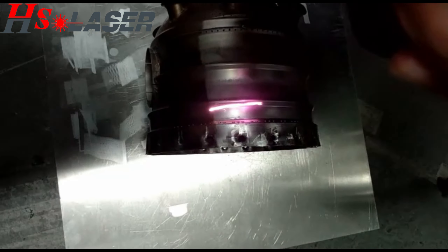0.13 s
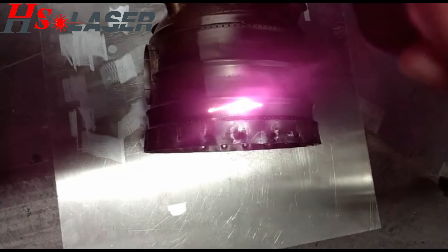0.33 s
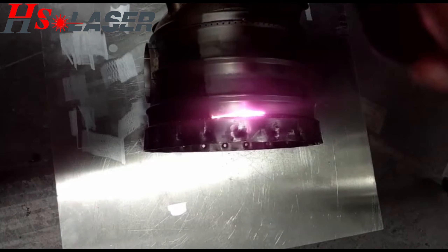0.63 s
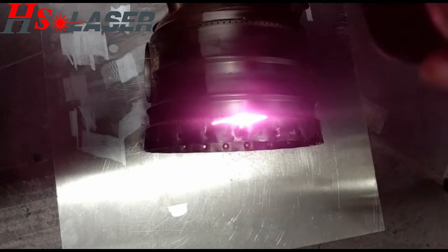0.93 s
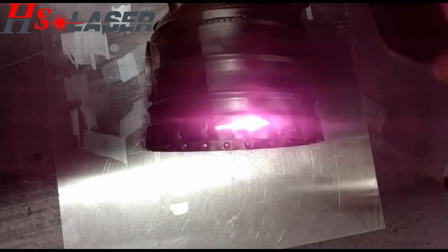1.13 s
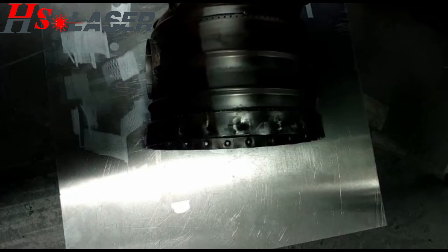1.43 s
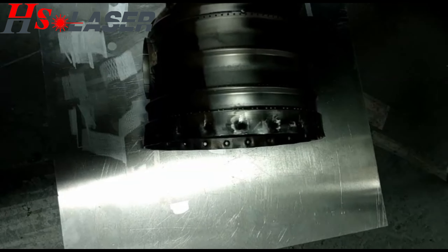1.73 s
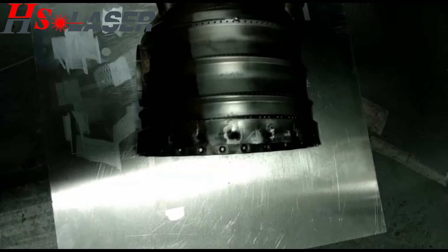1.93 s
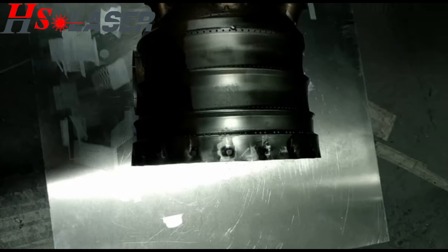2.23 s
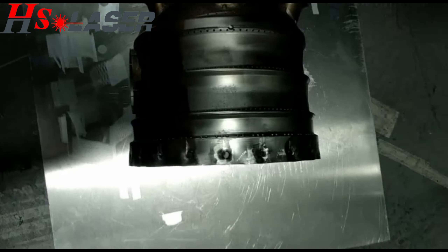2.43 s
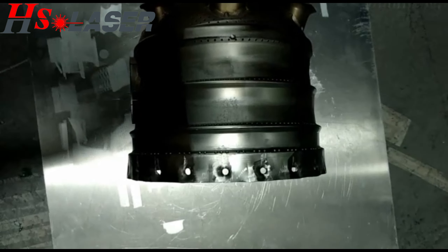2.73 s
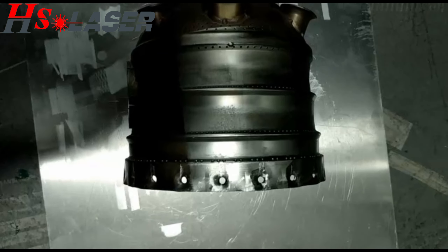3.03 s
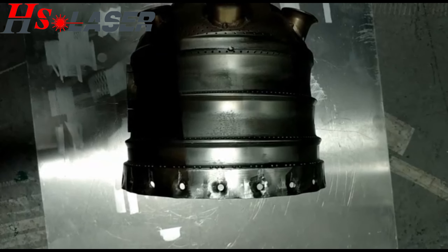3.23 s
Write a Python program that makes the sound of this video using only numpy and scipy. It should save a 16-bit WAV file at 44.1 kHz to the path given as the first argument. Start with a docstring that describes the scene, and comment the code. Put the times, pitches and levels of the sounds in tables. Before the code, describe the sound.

A pulsed laser cleaner buzzes harshly on a steel casing from the start, close by, its rapid snaps fluttering with a thin metallic whine. Dirt flakes crack, loudest around 0.7 seconds. At about 1.4 seconds the buzz stops, leaving the steady drone of a cooling unit in the workshop. A thin air hiss swells from 2 seconds, and a small scrape and a soft tick come around 3 seconds.

```python
"""Laser cleaning a steel casing

A pulsed laser sweeps a line across steel in a workshop, heard from a hand-held camera close by.
A hundred shots a second snap on the surface, harder at one end of the sweep and where the dirt is
thick; flakes crack and the laser head buzzes along. The beam stops near 1.45 s, leaving the drone
of the cooling unit, a hiss of air and a few small handling noises."""
import sys
import numpy as np
from scipy import signal
from scipy.fft import rfft, irfft
from scipy.io import wavfile
from scipy.ndimage import uniform_filter1d

SR = 44100
rng = np.random.default_rng(int(sys.argv[2]) if len(sys.argv) > 2 else 0)


def digitize_waveform(pressure):
    """Quantize a signal to 16-bit integers and store it at the path in sys.argv[1].

    Rows of a 2-D input are taken as channels; values are limited to [-1, 1].
    """
    field = np.atleast_2d(pressure).T
    bounded = np.clip(field, -1, 1)
    quanta = np.round(bounded * 32767).astype(np.int16)
    wavfile.write(sys.argv[1], SR, quanta)


N = 148617
T = np.arange(N) / SR

SHOT_HZ, FIRST_SHOT_S, STOP_S = 100, .0008, 1.445
SWEEP_HZ, SWEEP_PEAK_S = 32.85, .2
SNAP_DB, DIFFUSE_DB, CASING_DB, FIZZ_DB = 3, -9, 1, -1

# Rush of the cooling fans. Each row: frequency in Hz, relative level in dB.
FAN_COLOUR = [(25, -24), (80, -87), (115, -10), (150, -1), (230, 1.5), (360, 1.5), (560, 0.5), (800, -4),
              (1300, -5), (2000, -11), (3300, -22), (4700, -23), (7000, -24.5), (10000, -54)]
# Pump and fan tones. Each row: pitch in Hz, level in dB, width of the waver in Hz.
COOLER_TONES = [(97.3, -59.5, 0.33), (197.7, -44.5, 2.58), (390, -66, 9.8), (655, -51.5, 9.25),
                (986, -54.5, 3.9)]
# Three beating tones near 300 Hz. Each row: pitch in Hz, relative level in dB, width in Hz.
DRONE_PARTIALS = [(297, -2, 13.57), (312, 0, 15.48), (272.9, -7, 18.6)]
# Swells and dips of that drone. Each row: time in seconds, gain in dB.
DRONE_FADER = [(0.0, -47.5), (0.13, -32.5), (0.19, -64), (0.27, -42), (0.55, -35), (0.62, -68), (0.76, -38),
               (1.86, -39.5), (2.05, -32.5), (2.09, -69), (2.23, -33.5), (2.65, -37.5), (2.68, -64),
               (2.76, -33), (2.83, -82), (2.86, -41), (3.28, -37.5), (3.37, -66)]
# Air resonances in the cooler's cabinet. Each row: centre in Hz, level in dB, width in Hz.
CABINET_BANDS = [(170.7, -50, 17.4), (258, -45.5, 59), (416.2, -39.5, 41)]
# Colour of the air hiss. Each row: frequency in Hz, relative level in dB.
HISS_COLOUR = [(1500, 13), (3300, -0.5), (4600, 8), (5400, 3), (7000, 3.5), (8000, 9), (9300, 14),
               (10200, -3.5)]
# Fall and rise of the hiss. Each row: time in seconds, level in dB.
HISS_FADER = [(0, -49), (1.8, -59), (2.1, -49.5), (2.6, -49), (3.05, -45.5), (3.37, -48)]
# A soft handling tick. Each row: start in seconds, level in dB.
TICK_CUES = [(3.162, -37.5)]
# Colour of that tick. Each row: frequency in Hz, relative level in dB.
TICK_COLOUR = [(1200, -3), (2500, -1), (3600, -2), (6000, -9), (8800, 0), (10000, -12)]
# What the scrape rings. Each row: pitch in Hz, relative level in dB, T60 in seconds.
SCRAPE_MODES = [(1500, 0, .02), (1900, -6, .012)]
# A faint whistle. Each row: peak time and fade in seconds, pitch and width in Hz, level in dB.
WHISTLE_CUES = [(2.05, .28, 7730, 80, -65)]
# Ring of the laser head. Each row: pitch in Hz, relative level in dB, T60 in seconds.
HEAD_MODES = [(2200, -5, .02), (2900, -4, .03), (3300, -6, .04), (3700, -9, .1), (3900, -7, .1),
              (4100, -5, .12), (4500, -2.5, .12), (5500, -11, .3)]
# The head's whine as it is brought nearer. Each row: time in seconds, level in dB.
HEAD_FADER = [(0, -80), (.6, -53.5), (.9, -49.5), (1.45, -51.5)]
# Hollow ring of the casing at its wall and its rim. Each row: pitch in Hz, relative level in dB.
WALL_MODES = [(2210, 3.5), (2480, 3.5), (3000, 0), (3270, 7.5), (3980, 9.5), (4500, -16), (5020, 2.5),
              (5600, 3.5), (6450, -18), (7320, 3.5), (7850, -1), (8340, -15), (8770, 6.5), (9220, -5)]
RIM_MODES = [(2200, 4), (2900, -3), (3300, 4), (3950, 2.5), (4480, -6), (5100, -4), (5740, 4.5), (6680, -7),
             (7900, 4), (8500, 6), (9760, -9)]
# Bursting flakes. Each row: start in seconds, level in dB, brightness in dB per octave.
FLAKE_CUES = [(.2008, -38.5, 1.5), (.3208, -49, 1), (.5108, -38, 8.5), (.5408, -45, 6), (.6508, -35.5, -2),
              (.6608, -30, 0.5), (.6808, -43, -1), (.8408, -46, 5), (1.2008, -45.5, 0), (1.3208, -45, 7)]
# Colours of a flake's crack and a shot's snap. Each row: frequency in Hz, relative level in dB.
CRACK_COLOUR = [(200, -4), (700, 17), (2000, 11.5), (3500, 6.5), (5600, 14.5), (6800, 6.5), (8500, 16),
                (10300, -11)]
SNAP_COLOUR = [(300, -11), (1000, -1.5), (1700, -6), (2200, -5.5), (2700, -7), (4200, -6.5), (5200, 4),
               (5750, 4), (6500, 0), (7900, 7.5), (9000, 1), (9800, 9), (10300, -6)]
# How hard the beam bites into the dirt. Each row: time in seconds, relative level in dB.
BITE_FADER = [(0.02, -34.5), (0.26, -27.5), (0.29, -38.5), (0.32, -32.5), (0.54, -22.5), (0.62, -22.5),
              (0.66, -23.5), (0.78, -33), (0.81, -26), (0.87, -29.5), (0.96, -38.5), (1.08, -39),
              (1.21, -31), (1.27, -46), (1.3, -39.5), (1.33, -23), (1.38, -38), (1.42, -21), (1.45, -31)]
# How much softer the shots land at the far end of the sweep. Each row: time in seconds, drop in dB.
SWEEP_DROP = [(.03, 2.5), (.2, 33), (.37, 16.5), (.58, 27.5), (.75, 33), (.85, 14), (1.0, 23), (1.36, 12)]
# Brightness of the snaps. Each row: time in seconds, treble against body in dB.
SNAP_TILT = [(0.02, -17), (0.17, 1), (0.38, -14.5), (0.41, -7), (0.75, -7.5), (0.87, -0.5), (0.99, -16.5),
             (1.3, 1), (1.45, -10.5)]
# EQ of the reflections that give stereo width. Each row: frequency in Hz, gain in dB.
SIDE_EQ = [(25, 6), (70, -1), (160, -14.5), (300, -37.5), (700, -6.5), (2000, -19), (10000, -22)]


def undb(db):
    """Decibels to gain."""
    return 10 ** (np.asarray(db) / 20)


def curve(table, t):
    """Straight lines through the rows of a table."""
    return np.interp(t, *np.array(table, float).T)


def unit_rms(x):
    """Scale to rms 1."""
    return x / np.sqrt(np.mean(x ** 2))


def unit_energy(x):
    """Scale to energy 1."""
    return x / np.sqrt(np.sum(x ** 2))


def gains(table, size):
    """An EQ curve through (Hz, dB) points."""
    hz, db = np.array(table, float).T
    bins_hz = np.arange(size // 2 + 1) * SR / size
    return undb(np.interp(np.log(bins_hz + 1), np.log(hz), db))


def noise(colour):
    """Coloured noise, rms 1."""
    return unit_rms(irfft(rfft(rng.standard_normal(N)) * gains(colour, N), N))


def band(hz, width):
    """Noise in one narrow resonance, rms 1."""
    bins_hz = np.arange(N // 2 + 1) * SR / N
    rolloff = 1 + ((bins_hz - hz) / (width / 2)) ** 2
    return unit_rms(irfft(rfft(rng.standard_normal(N)) / rolloff, N))


def drift(rate_hz):
    """Smooth random modulation, rms 1."""
    hold = int(SR / rate_hz)
    steps = np.repeat(rng.standard_normal(N // hold + 1), hold)
    return unit_rms(uniform_filter1d(uniform_filter1d(steps, hold), hold)[:N])


def tone(hz, width, waver_db):
    """A machine tone that wavers in pitch and level, rms 1."""
    phase = 2 * np.pi * np.cumsum(hz + width / 2 * drift(18)) / SR
    return unit_rms(np.sin(phase) * undb(waver_db * drift(16)))


def grains(spread_db):
    """Dense tiny clicks of uneven size, rms 1."""
    return unit_rms(rng.standard_normal(N) * undb(spread_db * np.minimum(rng.exponential(size=N), 5)))


def click(colour, size=512):
    """The tightest click of a given colour (minimum phase)."""
    cepstrum = irfft(np.log(gains(colour, size)))
    cepstrum[1:size // 2] *= 2
    cepstrum[size // 2 + 1:] = 0
    return unit_energy(irfft(np.exp(rfft(cepstrum))))


def impulses(times, db):
    """Impulses whose level is their rms over one shot period."""
    track = np.zeros(N)
    np.add.at(track, np.round(np.asarray(times) * SR).astype(int), undb(db) * np.sqrt(SR / SHOT_HZ))
    return track


def modes(table):
    """Decaying partials from (Hz, dB, T60) rows."""
    t = T[:SR // 2]
    return unit_energy(sum(undb(db) * unit_energy(np.cos(2 * np.pi * hz * t) * undb(-60 * t / t60))
                           for hz, db, t60 in table))


def ring(x, response):
    """Pass a sound through a response."""
    return signal.fftconvolve(x, response)[:N]


def tail(delay_s, decay_s):
    """Dense reflections that die away after a pre-delay."""
    t = T[:SR // 2]
    envelope = (t >= delay_s) * np.exp(-np.maximum(t - delay_s, 0) / decay_s)
    return unit_energy(rng.standard_normal(len(t)) * envelope)


def direct_path(bounce_s=.00047, bounce_db=-6):
    """The straight path from the spot and one bounce off the casing."""
    response = np.zeros(int(bounce_s * SR) + 1)
    response[0], response[-1] = 1, undb(bounce_db)
    return response


def reflections(room_db=-2.5, room_t60_s=.31):
    """Reflections for one place of the spot: nearby metal, then the workshop."""
    metal = tail(delay_s=.0016, decay_s=.0024)
    room = tail(delay_s=.0057, decay_s=room_t60_s / np.log(1000))
    return metal + undb(room_db) * room


def cooler():
    """The bed: wavering pump and fan tones beat over cabinet resonances and rushing air."""
    rush = undb(-39 + .9 * drift(20)) * noise(FAN_COLOUR)
    tones = sum(undb(db) * tone(hz, width, waver_db=3.5) for hz, db, width in COOLER_TONES)
    drone = sum(undb(db) * tone(hz, width, waver_db=2.5) for hz, db, width in DRONE_PARTIALS)
    drone *= undb(curve(DRONE_FADER, T))
    cabinet = sum(undb(db) * band(hz, width) for hz, db, width in CABINET_BANDS)
    throb = undb(1.7 * drift(28.03))
    return rush + tones + (drone + cabinet) * throb


def air():
    """A thin hiss that sinks away, then swells after the beam is off."""
    return noise(HISS_COLOUR) * undb(curve(HISS_FADER, T) + 1.4 * drift(20))


def handling(scrape_at_s=2.978, scrape_length_s=.028, scrape_db=-37.5):
    """A soft tick, a short scrape and a faint whistle as the equipment is moved."""
    tap = ring(impulses(*np.array(TICK_CUES).T), click(TICK_COLOUR))
    tick = ring(tap, tail(0, decay_s=.009))
    contact = (T > scrape_at_s) & (T < scrape_at_s + scrape_length_s)
    scrape = undb(scrape_db) * ring(contact * grains(spread_db=9), modes(SCRAPE_MODES))
    whistle = sum(undb(db) * band(hz, width) * np.exp(-((T - at) / fade) ** 2)
                  for at, fade, hz, width, db in WHISTLE_CUES)
    return tick + scrape + whistle


def laser_head(jitter_db=3.5, waver_db=2.2):
    """The head ticks at the shot rate; each of its modes whines and wavers on its own."""
    times = np.arange(FIRST_SHOT_S, STOP_S, 1 / SHOT_HZ)
    ticks = impulses(times, jitter_db * rng.standard_normal(len(times)))
    whine = sum(undb(db + waver_db * drift(25)) * ring(ticks, modes([(hz, 0, t60)]))
                for hz, db, t60 in HEAD_MODES)
    return undb(curve(HEAD_FADER, T)) * whine / np.std(whine[:int(STOP_S * SR)])


def casing(hits, slide_s=(.53, .73), t60_s=.016):
    """The steel rings under the spot, crossfading as the spot slides from wall to rim."""
    fade = np.pi / 2 * np.interp(T, slide_s, [0, 1])
    wall = modes([(hz, db, t60_s) for hz, db in WALL_MODES])
    rim = modes([(hz, db, t60_s) for hz, db in RIM_MODES])
    return ring(hits * np.cos(fade), wall) + ring(hits * np.sin(fade), rim)


def flakes(reverb_db=-9, ring_db=-8):
    """Flakes of dirt burst under single shots: a hard, dry crack and a little ring."""
    bursts = np.zeros(N)
    for at, db, tilt in FLAKE_CUES:
        colour = [(hz, gain_db + tilt * np.log2(hz)) for hz, gain_db in CRACK_COLOUR]
        bursts += ring(impulses([at], db), click(colour))
    crack = ring(bursts, unit_energy(direct_path()))
    return crack + undb(reverb_db) * ring(bursts, reflections()) + undb(ring_db) * casing(bursts)


def beam(trim_db=-10, jitter_db=2, fizz_decay_s=.013, crossover_hz=4300):
    """Each shot blasts off dirt with a snap and a bright fizz, and rings the casing."""
    times = np.arange(FIRST_SHOT_S, STOP_S, 1 / SHOT_HZ)
    sweep = 2 * np.pi * SWEEP_HZ * (times - SWEEP_PEAK_S)
    drop_db = curve(SWEEP_DROP, times) * (1 - np.cos(sweep)) / 2
    shot_db = trim_db + curve(BITE_FADER, times) - drop_db
    shots = impulses(times, shot_db + jitter_db * rng.standard_normal(len(times)))
    # The sweeping spot crossfades between four sets of reflections at equal power.
    shares = np.array([drift(3.21) + np.interp(T, times, np.cos(sweep + k * np.pi / 2))
                       for k in range(4)])
    shares /= np.sqrt(np.sum(shares ** 2, axis=0))
    fizz_envelope = ring(shots, unit_energy(np.exp(-T[:SR // 20] / fizz_decay_s)))
    fizz = fizz_envelope * np.diff(grains(spread_db=4), prepend=0)
    wash = sum(ring(shots * share, reflections()) for share in shares) + undb(FIZZ_DB) * fizz
    attack = undb(SNAP_DB) * ring(shots, direct_path())
    steel = undb(CASING_DB) * casing(shots + wash)
    snaps = ring(attack + undb(DIFFUSE_DB) * wash + steel, click(SNAP_COLOUR))
    # Brightness seesaws about the crossover.
    body = signal.sosfiltfilt(signal.butter(2, crossover_hz, fs=SR, output="sos"), snaps)
    tilt = undb(curve(SNAP_TILT, T) / 2)
    return body / tilt + (snaps - body) * tilt


def scene(balance_db=-.45, shop_send_db=-31.5):
    """All sits near the centre; reflections widen the laser a little, the workshop far less."""
    laser = beam() + flakes() + laser_head()
    shop = cooler() + air() + handling()
    reverb = ring(laser + undb(shop_send_db) * shop, tail(0, decay_s=.06))
    side = irfft(rfft(reverb) * gains(SIDE_EQ, N), N)
    left_right = np.array([[1], [-1]])
    return laser * undb(left_right * balance_db / 2) + shop + left_right * side


def record(dry, low_cut_hz=116.5, high_cut_hz=10700):
    """The camera thins the deep bass and cuts the top."""
    thin = signal.sosfilt(signal.butter(2, low_cut_hz, "high", fs=SR, output="sos"), dry)
    lowpass = signal.firwin(161, high_cut_hz, window=("kaiser", 9), fs=SR)
    return signal.fftconvolve(thin, lowpass[None], mode="same", axes=1)


dry = scene()
out = record(dry)
digitize_waveform(out)
```